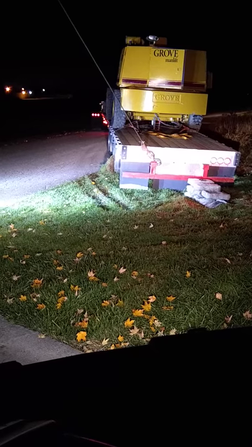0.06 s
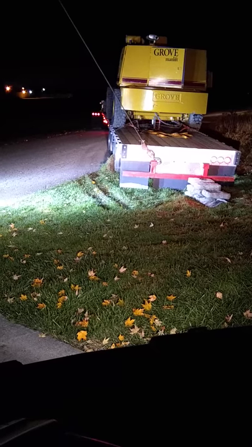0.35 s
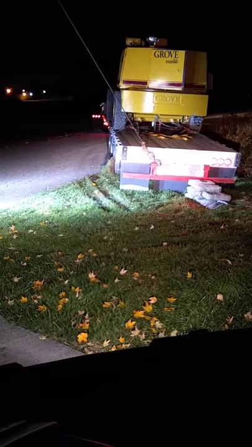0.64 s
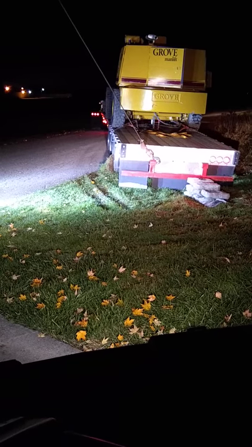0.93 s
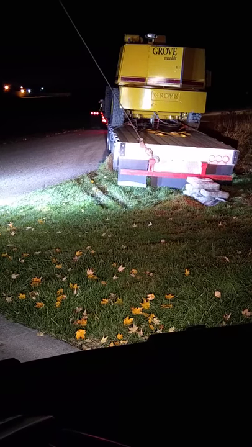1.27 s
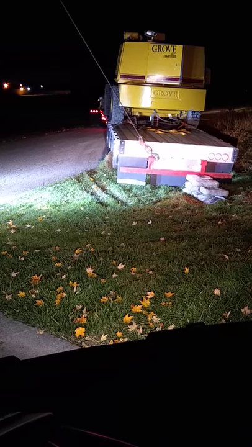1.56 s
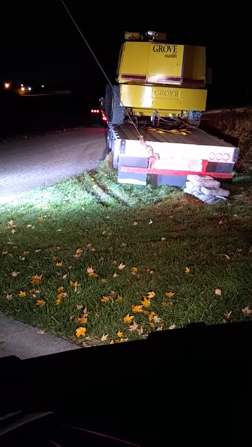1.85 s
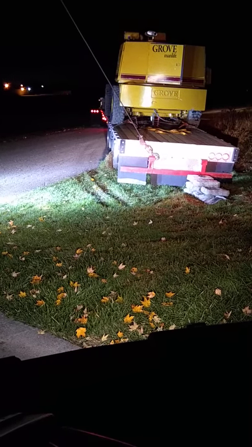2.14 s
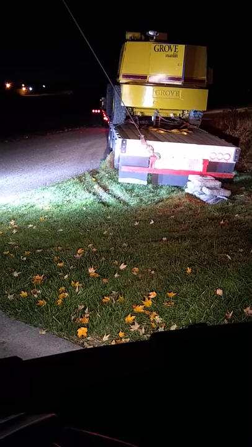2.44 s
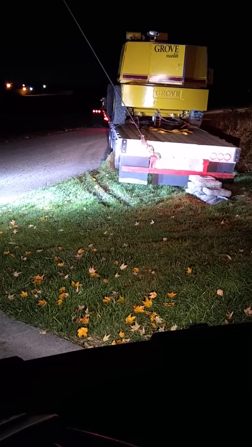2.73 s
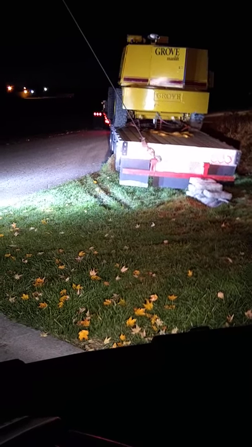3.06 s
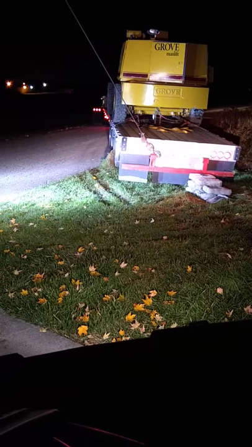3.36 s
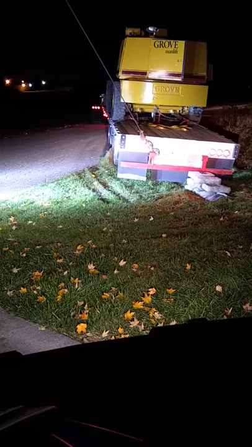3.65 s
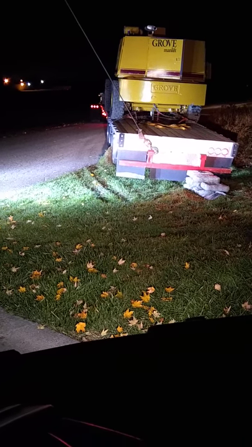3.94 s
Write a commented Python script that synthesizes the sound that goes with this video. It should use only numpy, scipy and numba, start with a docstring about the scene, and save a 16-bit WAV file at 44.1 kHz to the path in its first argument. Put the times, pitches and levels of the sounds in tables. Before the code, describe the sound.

Loud machinery roars and hisses near a mobile crane, over a lopsided engine idle. Heard from a parked vehicle, a close knock rattles early on and another near the end, each briefly ducking the roar before it swells back.

```python
"""A roadside at night, heard from a parked vehicle near a mobile crane. An engine idles with a lopsided
throb, because its firings are uneven. Fans and machinery roar, and puffs from the fans ring two
resonances, making a bright rasp that flutters about a hundred times a second. Two close, rattling knocks
push the microphone's automatic volume control down, and the roar swells back after each."""
import sys
import numpy as np
from scipy import signal
from scipy.fft import rfft, irfft
from scipy.io import wavfile
from numba import njit

SR = 44100
rng = np.random.default_rng(int(sys.argv[2]) if len(sys.argv) > 2 else 0)


def pcm_store(signal):
    """Save signal as 16-bit PCM."""
    levels = np.round(np.clip(np.atleast_2d(signal), -1, 1) * 32767)
    wavfile.write(sys.argv[1], SR, levels.astype(np.int16).T)


N = 176400


def undb(db):
    """Turn decibels into a multiplier."""
    return 10 ** (np.asarray(db) / 20)


def times():
    """Time of every sample."""
    return np.arange(N) / SR


def freqs():
    """Frequency of every point in the spectrum."""
    return np.maximum(np.arange(N // 2 + 1) * SR / N, 1)


def curve(rows, column=1):
    """One column of a table, joined by straight lines in time."""
    rows = np.array(rows)
    return np.interp(times(), rows[:, 0], rows[:, column])


def colour(points):
    """A filter curve drawn through (Hz, dB) points."""
    hz, db = np.array(points).T
    return undb(np.interp(np.log(freqs()), np.log(hz), db))


def shape(x, response):
    """Pass a sound through a filter curve."""
    return irfft(rfft(x) * response, N)


def resonance(hz, width_hz):
    """Filter curve of something that rings at one pitch."""
    return 1 / (1 + 1j * (freqs() ** 2 - hz ** 2) / (freqs() * width_hz))


def lowpass(x, hz):
    """Soften everything above hz."""
    return signal.sosfilt(signal.butter(2, min(hz, SR / 2 - 1), fs=SR, output="sos"), x)


def unit(x):
    """Scale to an average (rms) size of 1."""
    return x / np.sqrt(np.mean(x ** 2))


def noise():
    """Two unrelated white noises: one for direct sound, one for scattered sound."""
    return rng.standard_normal((2, N))


def band(hz, width_hz):
    """Noise gathered around one pitch."""
    return unit(shape(noise(), resonance(hz, width_hz) ** 2))


def wander(rate_hz):
    """A smooth random wobble around zero, of size 1."""
    slow_part = np.exp(-(freqs() / rate_hz) ** 2) * (np.arange(N // 2 + 1) > 0)
    return unit(shape(rng.standard_normal(N), slow_part))


def fade(age, t60):
    """Silent until it starts, then dies away by 60 dB in t60 seconds."""
    return (age > 0) * np.exp(-np.log(1000) * np.abs(age) / t60)


# Firings within one turn of the engine: t/s, level/dB
FIRINGS = [(0, -2.3), (.0357, 0), (.0627, -14)]
# How the throb rises and falls: t/s, level/dB
THROB_LEVEL = [(0, 3.5), (.5, 2.5), (.8, 3.5), (1.2, 2), (2.9, 2.5), (3.2, 1.5), (3.5, -5.5), (4, -7.5)]

def engine_idle(turn_s=.09578, boom_hz=133, glide_hz_per_s=2800, width_s=.0059, level_db=-18.5):
    """Each uneven firing is a short, rising boom, a little later and softer on the left."""
    t = times() - np.array([[.0016], [0]])
    throb = np.zeros((2, N))
    for turn in np.arange(-.0418, N / SR, turn_s):
        for offset, db in FIRINGS:
            scatter_db, skew = rng.standard_normal(2) * (1.1, .22)
            near = np.abs(t[1] - turn - offset) < turn_s / 2
            age = t[:, near] - turn - offset
            cycles = boom_hz * age + glide_hz_per_s * age ** 2 / 2
            swell = undb(db + scatter_db) * np.exp(-(age / width_s) ** 2 / 2)
            throb[:, near] += swell * np.cos(2 * np.pi * cycles + skew)
    pan_db = np.array([[-2.5], [0]])
    return throb * undb(level_db + curve(THROB_LEVEL) + pan_db)


# Humming notes in the roar: f/Hz, width/Hz, starting level/dB, change/(dB per s)
DRONES = [(222, 14, -37.5, -4), (451, 25.4, -43.5, 2.5), (556.6, 17.6, -30, -3.5),
          (651, 22.8, -26.5, -0.94), (897, 20.3, -40, 2.66), (1001, 21, -32.5, -4)]

def drones():
    """Narrow resonances hum, each part noise and part wavering tone."""
    hum = np.zeros((2, N))
    for hz, width, db, change in DRONES:
        breath = band(hz, width)
        pitch_hz = hz + width / 5 * wander(3.9)
        tone = np.sin(2 * np.pi * np.cumsum(pitch_hz) / SR)
        hum += undb(db + change * times()) * unit(breath + tone)
    return hum


# Pitches at which the ducts ring: f/Hz, width/Hz, level/dB
DUCTS = [(1766, 220, -36), (2364, 71, -32), (2716, 350, -30), (4027, 150, -40), (5150, 800, -40.5)]

def ducts():
    """Air rings the ducts in broad bands of hiss."""
    return sum(undb(db) * band(hz, width) for hz, width, db in DUCTS)


# Tone of the roar: f/Hz, level/dB
ROAR_TONE = [(20, -84), (45, -60), (85, -63), (170, -58.5), (275, -58.5), (400, -51.5), (700, -49),
             (1000, -52.5), (1300, -60.5), (1700, -68), (2600, -138)]

def roar(level_db, flicker_db=.23):
    """The low, slightly flickering noise of the machinery."""
    rumble = shape(noise(), colour(ROAR_TONE)) * np.sqrt(SR / 2)
    return rumble * undb(level_db + flicker_db * wander(49))


# Tone of the rushing air: f/Hz, level/dB
RUSH_TONE = [(700, -65.5), (1250, -56), (1520, -54.5), (1750, -52.5), (1900, -50), (2100, -77),
             (2500, -53.5), (2830, -75.5), (3050, -49), (3700, -54), (4080, -47), (4380, -76.5),
             (4650, -61), (5300, -58), (5700, -67.5), (6100, -64.5), (6800, -71.5), (7400, -65),
             (9000, -69.5), (12000, -70.5), (14000, -76), (15500, -69)]
# How its treble rises and falls: t/s, level/dB
TREBLE_LEVEL = [(0, -0.5), (.7, -2.5), (1.6, 0.5), (2.6, 0.5), (3.3, 1), (4, 1.5)]

def air_rush(level_db, fan_puffs, flicker_db=.23, swell_db=.69, echo_db=-4.5, treble_hz=6300):
    """A bright rush of air, coloured by close echoes, that pulses with the fans."""
    air = shape(noise(), colour(RUSH_TONE)) * np.sqrt(SR / 2)
    air *= undb(level_db + flicker_db * wander(47) + swell_db * wander(3.3))
    echoes = rng.standard_normal(N) * fade(times(), t60=.18)
    air += undb(echo_db) * shape(air, rfft(echoes / np.sqrt(np.sum(echoes ** 2))))
    treble = shape(air, 1 / (1 + (treble_hz / freqs()) ** 10))
    air += treble * (undb(curve(TREBLE_LEVEL)) - 1)
    pulsing = unit(1 + .13 * unit(np.abs(fan_puffs[0])))
    return air * pulsing


# How the machinery swells: t/s, roar and drone level/dB, rush level/dB, duct level/dB
MACHINE_LEVELS = [(0, 1, -3.5, -8), (.4, -.5, -4.5, -13), (.625, 1.5, -2.5, -16), (.7, 3.5, -1.5, -3),
                  (1, 3.5, 2, -3.5), (1.5, 2.5, 0, 3.5), (2.1, 2.5, 2, 2.5), (2.65, 6, 5, 4.5),
                  (2.95, 4, 3, 6.5), (3.1, 2, -1.5, 6), (3.4, -3.5, -3, -1), (3.85, -2.5, -3.5, 2),
                  (4, -6, -5.5, -3)]

def machinery(fan_puffs):
    """Drones, ducts, roar and rushing air build up and then ease off."""
    roar_db, rush_db, duct_db = (curve(MACHINE_LEVELS, column) for column in (1, 2, 3))
    ringing = drones() * undb(roar_db) + ducts() * undb(duct_db)
    return ringing + roar(roar_db) + air_rush(rush_db, fan_puffs)


def puffs(rate_hz, puff_share=.14, tone_strength=3.7):
    """A fan gives one short puff a turn; complex numbers hold the strength and phase of its ring."""
    turn_position = np.cumsum(rate_hz * (1 + .0043 * wander(38))) / SR % 1
    pulse = np.exp(-turn_position / puff_share)
    grit = np.array([wander(280) + 1j * wander(610) for _ in range(2)])
    tone = tone_strength * np.exp(2j * np.pi * wander(20.4))
    return pulse * (grit + tone)


def fans(first_hz, second_hz=124.1, second_db=-5):
    """Two fans flutter at nearby rates."""
    return puffs(first_hz) + undb(second_db) * puffs(second_hz)


# The rasp over time: t/s, first fan's rate/Hz, sharp ring level/dB, broad ring level/dB, broad ring f/Hz
RASP = [(0, 108, -15, -29, 3250), (.2, 111.2, -20.5, -24.5, 3600), (.55, 105.8, -17.5, -25.5, 3650),
        (.85, 108.1, -17, -19, 3270), (1.25, 109.4, -19.5, -17.5, 3277), (2, 106.8, -29, -18.5, 3293),
        (2.4, 106, -22, -15.5, 3335), (2.75, 101.4, -19, -14, 3380), (3.3, 101.9, -23.5, -22, 3368),
        (4, 97.5, -31.5, -22, 3288)]
# Brief jumps and dips of the sharp ring: t/s, level change/dB
SURGES = [(0.04, -9), (0.067, 5), (.48, -6), (.532, 4.5), (0.853, 8.5), (0.91, 7.5), (1.4, -14), (1.53, 3),
          (2.01, 15)]

def rasp(fan_puffs, sharp_hz=3144, surge_width_s=.011):
    """The puffs ring a sharp resonance, which surges now and then, and a broad one that drifts."""
    def ring(hz, width_hz):
        tone = np.exp(2j * np.pi * np.cumsum(hz) / SR)
        return unit((lowpass(fan_puffs, width_hz / 2) * tone).real)

    surge_db = sum(db * np.exp(-((times() - at) / surge_width_s) ** 2 / 2) for at, db in SURGES)
    sharp = undb(curve(RASP, 2) + surge_db) * ring(np.full(N, sharp_hz), width_hz=125)
    broad = undb(curve(RASP, 3)) * ring(curve(RASP, 4), width_hz=510)
    return sharp + broad


# Two knocks and their rattles: t/s, thud level/dB, thud f/Hz, crack level/dB, crack top f/Hz
KNOCKS = [(0.631, -2, 365, -5, 5400), (.638, -8.5, 292, -4.5, 4400), (0.658, -5.5, 234, -14, 1800),
          (0.674, -11, 387, -16, 1500), (0.682, -4, 244.6, -19, 1500), (0.711, -6, 204, -30, 1200),
          (3.003, -8, 269, -3.5, 17600), (3.01, -8, 1001, -4, 4207), (3.021, -2, 205, -8, 1200),
          (3.05, -3, 234, -10.5, 1000), (3.108, -11, 248, -33, 1000), (3.168, -14.5, 222, -34, 1000)]
# Panel notes rung by every crack: f/Hz, level/dB next to the crack, fade time/s
PANEL_NOTES = [(497, -12, 0.22), (642, -9, 0.24), (824, -4, 0.083), (1070, 4, 0.032), (1180, -5.5, 0.052)]

def knocks(roughness=.68, thud_rise_s=.0028, tick_db=8, cabin_db=-10):
    """Each hit is a crack, ringing panels and a hollow thud, with a short dull echo from the cabin."""
    hits = np.zeros((2, N))
    for start, thud_db, thud_hz, crack_db, top_hz in KNOCKS:
        age = times() - start
        rumble = unit(shape(rng.standard_normal(N), resonance(thud_hz, width_hz=86) ** 2))
        body = np.sin(2 * np.pi * thud_hz * age) + roughness * rumble
        thud = body * fade(age, t60=.16) * np.clip(age / thud_rise_s, 0, 1)
        panel = sum(undb(db) * np.sin(2 * np.pi * hz * age) * fade(age, t60)
                    for hz, db, t60 in PANEL_NOTES)
        snap = fade(age, t60=.092) + undb(tick_db) * fade(age, t60=.005)
        crack = lowpass(unit(lowpass(noise(), top_hz)) * snap, top_hz)
        hits += undb(crack_db) * crack
        hits[0] += undb(thud_db) * thud + undb(crack_db) * panel  # direct sound only
    cabin_fade = fade(times(), t60=.55)
    cabin = lowpass(noise(), hz=700) * cabin_fade / np.sqrt(np.sum(cabin_fade ** 2))
    return hits + undb(cabin_db) * shape(hits[0], rfft(cabin))


# How much scattered sound goes to the sides: f/Hz, level/dB
STEREO_WIDTH = [(60, 1.5), (300, 0.5), (500, -10.5), (750, -14), (1100, -25.5), (1500, 0), (2100, 4),
                (2850, -6), (3250, -14), (3900, -7), (6000, -4.5), (15000, -5.5)]
# How much louder the left is than the right: f/Hz, level/dB
BALANCE = [(100, -1), (1100, -0.5), (1400, -3.5), (2100, 0), (2850, -5), (3150, -1), (3450, 3),
           (3850, -0.5), (4400, -9.5), (5300, 1), (6100, 1.5), (9500, 0), (12000, 4), (15000, -0.5)]

def spread(pair, swing_hz=2205, side_db=-11.5):
    """Share sound between left and right; going up in pitch, it swings between centre and sides."""
    direct, scattered = rfft(pair)
    angle = np.pi * np.maximum(freqs() / swing_hz, .5)
    centre, swing = np.sin(angle), undb(side_db) * np.cos(angle)
    width, lean = colour(STEREO_WIDTH), np.sqrt(colour(BALANCE))
    side = 1j * swing * direct + width * scattered
    left, right = (centre * direct + side) * lean, (centre * direct - side) / lean
    total = np.sqrt(centre ** 2 + swing ** 2 + width ** 2)
    return irfft(np.array([left, right]) / total, N)


def scene():
    """The idling engine under the machinery, the rasp and the knocks."""
    fan_puffs = fans(curve(RASP, 1))
    return engine_idle() + spread(machinery(fan_puffs) + rasp(fan_puffs) + knocks())


@njit
def follow(x, rise_s, fall_s):
    """Track a level, rising at one speed and falling at another."""
    tracked, level = np.empty(len(x)), 0.
    for i in range(len(x)):
        level += (x[i] - level) / (SR * (rise_s if x[i] > level else fall_s))
        tracked[i] = level
    return tracked


def record(dry, low_cut_hz=65, top_hz=15600, limit_db=-15.5, detect_s=.0058, look_ahead_s=.0085):
    """The microphone trims deep bass and top treble, turns down on loud sounds and recovers slowly."""
    thinned = signal.sosfilt(signal.butter(3, low_cut_hz, "high", fs=SR, output="sos"), dry)
    power = lowpass(np.mean(thinned ** 2, axis=0), 1 / (2 * np.pi * detect_s))
    over_db = np.maximum(10 * np.log10(np.maximum(power, 1e-9)) - limit_db, 0)
    dip_db = follow(over_db, rise_s=.0022, fall_s=.37)
    turned_down = thinned * undb(-np.interp(times() + look_ahead_s, times(), dip_db))
    top_cut = signal.ellip(8, .2, 70, top_hz, fs=SR, output="sos")
    return signal.sosfilt(top_cut, np.clip(turned_down, -1, 1))


dry = scene()
out = record(dry)
pcm_store(out)
```